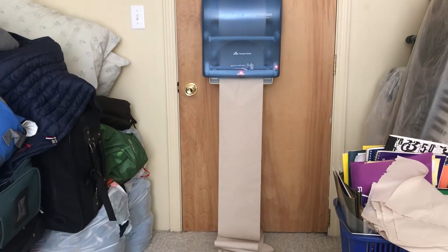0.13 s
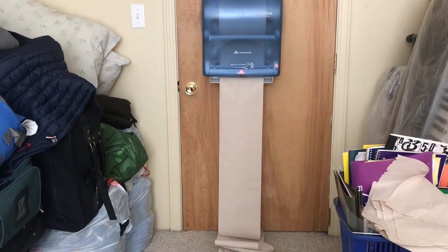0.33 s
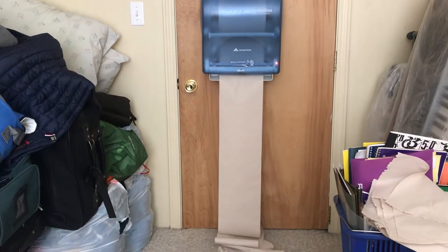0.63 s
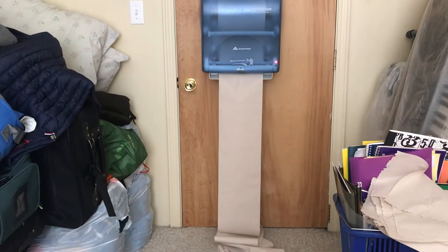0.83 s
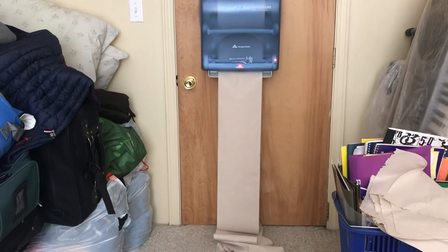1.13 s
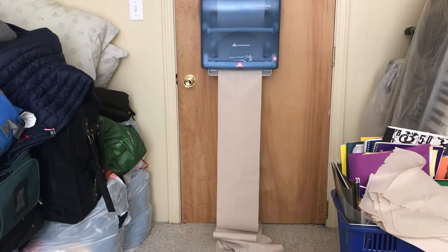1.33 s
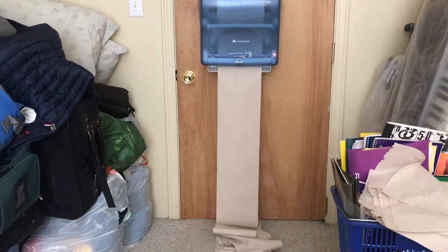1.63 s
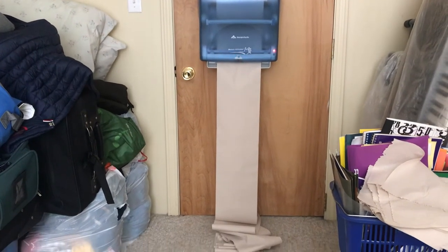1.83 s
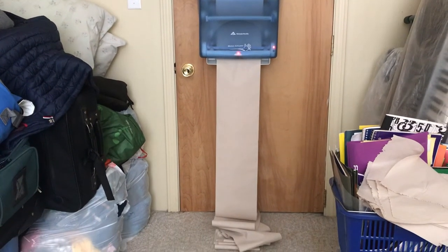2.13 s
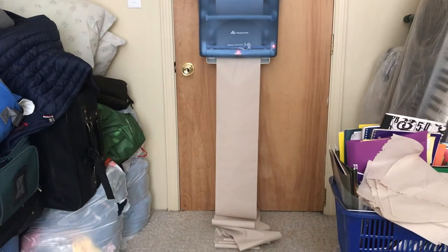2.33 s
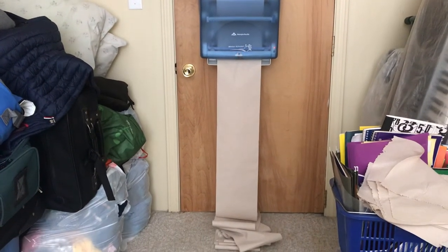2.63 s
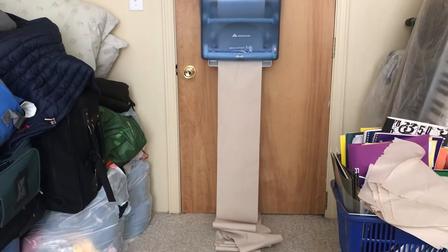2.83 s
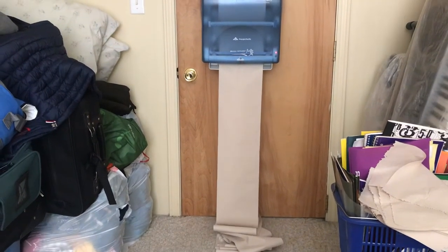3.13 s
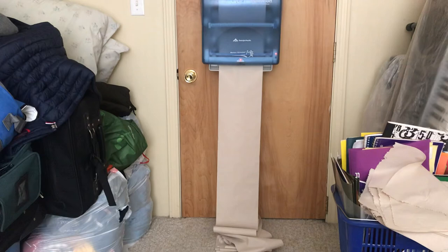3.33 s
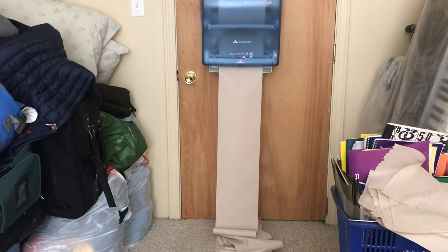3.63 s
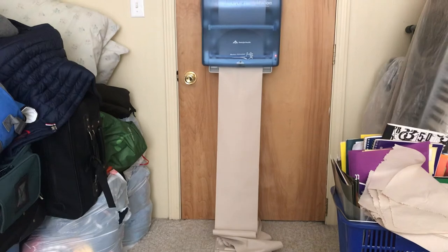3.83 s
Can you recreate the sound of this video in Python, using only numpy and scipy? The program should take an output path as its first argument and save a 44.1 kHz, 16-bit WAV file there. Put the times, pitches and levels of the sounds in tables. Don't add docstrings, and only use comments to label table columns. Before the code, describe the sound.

An automatic paper towel dispenser runs in a small, quiet bedroom, heard from a few metres away. Until about 2.6 seconds there is only low rumble, soft hiss and faint hum. A soft thud and gear knock lead into a rapidly rising motor whine, steady by 3.0, with hollow plastic rattle. Paper rustles and snaps from 2.8; roller thuds fall near 3.1 and 3.6. It is still running at 4.0.

```python
import sys
import numpy as np
from scipy import signal
from scipy.fft import rfft, irfft, next_fast_len
from scipy.io import wavfile
from scipy.ndimage import map_coordinates

SR = 44100
rng = np.random.default_rng(int(sys.argv[2]) if len(sys.argv) > 2 else 0)


def generate_wav(signal):
    frames = np.transpose(np.atleast_2d(signal))
    scaled = np.clip(frames, -1, 1) * 32767
    pcm = np.round(scaled).astype(np.int16)
    wavfile.write(sys.argv[1], SR, pcm)


def gain_from_decibels(decibels):
    exponent = np.asarray(decibels, float) / 20
    return 10 ** exponent


N = 176400

# freq_hz, level_db (per Hz)
RUMBLE_SPECTRUM = [(18, -23), (35, -7.5), (60, 0.5), (120, -5), (170, -5.5), (310, -11.5), (480, -25)]
# freq_hz, level_db (per Hz)
HISS_SPECTRUM = [(300, 1.5), (1000, -4), (3000, -10), (7000, -14.5), (11000, -15), (15700, -16)]
RUMBLE_DB, HISS_DB = -66.5, -72.5
MAINS_HZ, MAINS_DB = 59.8, -77

# start_s, level_db, pitch_hz, t60_s
THUDS = [
    (3.118, -43, 105, 0.12),
    (3.638, -41.5, 105.5, 0.14),
    (3.688, -52, 83, 0.18),
    (2.59, -62, 99, 0.24),
    (2.689, -54.5, 194, 0.14),
    (2.73, -51.5, 192, .12),
]

# time_s, speed_turns_per_s
SHAFT_SPEED = [(2.64, 50), (2.665, 90), (2.7, 128), (2.74, 152), (2.79, 168), (2.85, 176), (2.96, 183),
               (3.04, 186.5), (3.3, 187), (3.38, 185.5), (3.46, 180.5), (3.58, 178), (3.66, 176),
               (3.76, 180.5), (3.86, 184), (4.0, 182.5)]
# time_s, hum_db, load_db
SHAFT_STRENGTH = [(2.64, -95, -77), (2.67, -77, -68), (2.70, -77, -55), (2.74, -64, -49.5),
                  (2.79, -58.5, -46), (2.85, -53, -48), (2.96, -52, -46), (3.04, -66, -48),
                  (3.12, -61.5, -46.5), (3.19, -73, -47), (3.26, -61, -46.5), (3.36, -56, -47.5),
                  (3.46, -55.5, -47), (3.58, -59, -47), (3.679, -74, -47), (3.76, -66, -46),
                  (3.86, -59.5, -46), (4.0, -65, -48)]
FULL_SPEED = 142
TEETH_PER_TURN = 2.36
# multiple_of_mesh_rate, level_db (over the load)
MESH_HARMONICS = [(1, -16.5), (2, -13), (3, -16), (4, -14), (5, -23.5), (6, -26)]
# multiple_of_shaft_speed, level_db (over the load)
SIDE_LINES = [(1.5, -21), (1.7, -25.5), (3.71, -22), (3.92, -20), (4.21, -19), (5.62, -17), (5.9, -18),
              (7.58, -19), (8.25, -19.5), (8.92, -20.5), (10.46, -26), (11.25, -27)]
# freq_hz, width_hz, level_db
HOUSING_MODES = [(426, 24.5, 5), (660, 42, 2), (734, 18, 8), (852, 66, 3), (1022, 35, 8), (1140, 44, 6.5),
                 (1276, 47, 4), (1516, 25, 0.5), (1640, 80, 3), (1748, 61, 3.5), (1860, 29, -1),
                 (2130, 260, -1), (2653, 45, 2.5), (2940, 110, 4.5)]
# freq_hz, level_db (per Hz)
RATTLE_SPECTRUM = [(120, -7.5), (200, -6.5), (500, -5.5), (850, -8), (1700, -0.5), (2500, -8),
                   (4000, -20.5), (16000, -80)]
DULL_HZ, EARLY_DB = 1150, 8
# freq_hz, level_db (per Hz)
FIZZ_SPECTRUM = [(1500, -20), (2300, -2), (3050, 0), (3400, -8.5), (4500, -8.5), (9200, -21.5),
                 (10400, -27.5), (15800, -31.5)]
FIZZ_DB, BRIGHT_DB = -11.5, 12
# start_s, level_db, centre_hz, t60_s
KNOCKS = [
    (2.641, -66.5, 990, .2),
    (2.688, -53, 1000, 0.29),
    (2.785, -44.5, 1150, 0.21),
    (3.633, -42, 1580, 0.17),
]

# time_s, rustle_peak_db, snap_peak_db, length_s
PAPER_EVENTS = [(2.803, -54, -61, 0.019), (2.864, -74, -79, 0.016), (2.92, -78, -90, .01),
                (2.948, -65, -86, .025), (3.02, -60, -90, 0.019), (3.095, -68, -88, 0.051),
                (3.103, -53.5, -61, 0.019), (3.165, -66, -58.5, .018), (3.255, -57.5, -86, 0.019),
                (3.324, -57, -88, .012), (3.41, -60, -80, .025), (3.555, -56, -88, .02),
                (3.573, -70, -70, .015), (3.633, -55.5, -62, .015), (3.652, -55.5, -88, 0.013),
                (3.715, -56.5, -81, 0.033), (3.78, -73, -90, 0.0088), (3.818, -62, -88, 0.014),
                (3.878, -52.5, -84, .015), (3.912, -58.5, -88, .012), (3.94, -62, -86, .03),
                (3.955, -70, -54, 0.0086), (3.967, -72, -61, 0.014)]
# freq_hz, level_db (per Hz)
RUSTLE_SPECTRUM = [(2500, -16), (4000, -1), (4950, -3.5), (5500, -1), (6300, -9.5), (7300, -11.5),
                   (9500, -21.5), (16000, -45)]
# freq_hz, level_db (per Hz)
SNAP_SPECTRUM = [(5000, -27), (8000, 1), (9500, -3), (10600, -10), (12200, -6), (14300, -4), (16000, -6)]
FEED_S, CRINKLE_DB = 2.74, -74

# freq_hz, t60_s
ROOM_DECAY = [(200, 0.48), (2000, 0.28), (10000, 0.31)]
WET_DB = -5.5
# freq_hz, width_hz, depth_db
MIC_DIPS = [(4950, 190, -2.5), (7500, 300, -1.5), (10460, 690, -4.5)]


def unit(x):
    return x / np.sqrt(np.mean(x ** 2) + 1e-20)


def along(points, hz):
    f, v = np.transpose(points)
    return np.interp(np.log(hz + 1), np.log(f + 1), v)


def wobble(rate):
    knots = rng.standard_normal(int(N * rate / SR) + 4)
    return map_coordinates(knots, [np.arange(N) * rate / SR])


def filtered(x, response):
    m = next_fast_len(N + SR // 2)
    return irfft(rfft(x, m) * response(np.fft.rfftfreq(m, 1 / SR)), m)[..., :N]


def noise(spectrum, edge_db=-60):
    low, high = (spectrum[0][0] / 2, edge_db), (spectrum[-1][0] * 2, edge_db)
    points = [low] + list(spectrum) + [high]
    return unit(filtered(rng.standard_normal(N), lambda hz: gain_from_decibels(along(points, hz))))


def room_tone():
    t = np.arange(N) / SR
    rumble = gain_from_decibels(RUMBLE_DB + 0.42 * wobble(3.06)) * noise(RUMBLE_SPECTRUM)
    hiss = gain_from_decibels(HISS_DB) * noise(HISS_SPECTRUM)
    mains = gain_from_decibels(MAINS_DB + 2 * wobble(6.4)) * np.sin(2 * np.pi * MAINS_HZ * t + 0.31 * wobble(7.4))
    return rumble + hiss + mains


def roller():
    out = np.zeros(N)
    for start, db, hz, t60 in THUDS:
        age = np.clip(np.arange(N) / SR - start, 0, 2)
        envelope = gain_from_decibels(db - 60 * age / t60) * (1 - np.exp(-age / 0.005))
        out += envelope * np.sin(2 * np.pi * hz * age)
    return out


def shaft_hum(turn, hum_db):
    level = np.sqrt(2) * gain_from_decibels(hum_db + 1.2 * wobble(25))
    return level * np.sin(turn + 0.2 * wobble(30))


def resonance(hz):
    modes = sum(gain_from_decibels(db) * 1j * hz * w / (c * c - hz * hz + 1j * hz * w) for c, w, db in HOUSING_MODES)
    return 0.84 + modes


def gear_whine(turn, speed):
    grid_hz = np.arange(4000.)
    carried = np.abs(resonance(grid_hz)) ** 0.39
    lines = [(TEETH_PER_TURN * k, db) for k, db in MESH_HARMONICS] + list(SIDE_LINES)
    whine = np.zeros(N)
    for k, db in lines:
        level = gain_from_decibels(db + 2.4 * wobble(21.99)) * np.interp(k * speed, grid_hz, carried)
        whine += level * np.sin(k * turn + 0.65 * wobble(40))
    return whine


def gear_rattle(turn, speed):
    teeth = (1 + 0.1 * np.cos(turn)) * (1 + 0.3 * np.cos(TEETH_PER_TURN * turn)) * gain_from_decibels(0.33 * wobble(18))
    impacts = teeth * gain_from_decibels(1.7 * wobble(250)) * rng.standard_normal(N)
    full = unit(filtered(impacts, lambda hz: gain_from_decibels(along(RATTLE_SPECTRUM, hz)) * resonance(hz)))
    dull = filtered(full, lambda hz: 1 / (1 + (hz / DULL_HZ) ** 6))
    ratio = speed / FULL_SPEED
    early_gain = gain_from_decibels(EARLY_DB * np.clip(1 - ratio, 0, 1))
    body = early_gain * dull + (full - dull) * np.clip(ratio, 0, 1) ** 1.2
    grains = gain_from_decibels(2.2 * wobble(70) + 1.6 * wobble(700))
    fizz = unit(teeth * grains * noise(FIZZ_SPECTRUM))
    return body + gain_from_decibels(FIZZ_DB + BRIGHT_DB * np.log10(ratio)) * fizz


def knocks():
    t = np.arange(N) / SR
    out = np.zeros(N)
    for start, db, hz, t60 in KNOCKS:
        decay = gain_from_decibels(db - 60 * np.clip(t - start, 0, 1) / t60)
        attack = np.clip((t - start) / 0.0037, 0, 1)
        out += decay * attack * noise([(hz / 1.23, -6), (hz, 0), (hz * 1.16, -6)])
    return out


def motor():
    t = np.arange(N) / SR
    time, hum_db, load_db = np.transpose(SHAFT_STRENGTH)
    speed = np.interp(t, *np.transpose(SHAFT_SPEED))
    load = gain_from_decibels(np.interp(t, time, load_db, left=-150))
    turn = 2 * np.pi * np.cumsum(speed * (1 + 0.002 * wobble(25.06))) / SR
    hum = shaft_hum(turn, np.interp(t, time, hum_db, left=-150))
    whine = gear_whine(turn, speed)
    through_wall = hum + load * whine
    through_air = load * (0.2 * whine + gear_rattle(turn, speed)) + knocks()
    return through_wall, through_air


def paper():
    t = np.arange(N) / SR
    swell, crack = np.zeros(N), np.zeros(N)
    for time, rustle_db, snap_db, length in PAPER_EVENTS:
        swell += gain_from_decibels(rustle_db) * np.exp(-((t - time) / (0.42 * length)) ** 2)
        decay = gain_from_decibels(snap_db + 0.5 - 18 * np.clip(t - time, 0, 1) / length)
        crack += decay * np.clip((t - time) / 0.007 + 0.5, 0, 1)
    crinkle = gain_from_decibels(CRINKLE_DB + 5.4 * wobble(45)) * np.clip((t - FEED_S) / 0.06, 0, 1)
    rustle = (swell + crinkle) * gain_from_decibels(2.1 * wobble(350)) * noise(RUSTLE_SPECTRUM)
    snap = crack * gain_from_decibels(1.5 * wobble(500)) * noise(SNAP_SPECTRUM)
    return rustle + snap


def room(x):
    hz, t, z = signal.stft(rng.standard_normal(SR // 2), SR, nperseg=256)
    decay = gain_from_decibels(-60 * t / along(ROOM_DECAY, hz)[:, None])
    tail = signal.istft(z * decay, SR, nperseg=256)[1]
    delayed = np.pad(x, (200, 0))
    return signal.fftconvolve(delayed, tail / np.linalg.norm(tail))[:N]


def scene():
    tone = room_tone()
    thuds = roller()
    through_wall, gears = motor()
    near = gears + paper()
    airborne = 0.89 * (near + gain_from_decibels(WET_DB) * room(near))
    return (airborne + through_wall + thuds + tone)[None]


def roll_off(x):
    return signal.sosfilt(signal.butter(12, 15700, fs=SR, output="sos"), x)


def record(dry):
    def port(hz):
        return gain_from_decibels(sum(db * np.exp(-((hz - c) / w) ** 2) for c, w, db in MIC_DIPS))
    mix = filtered(dry, port)
    return roll_off(mix)


dry = scene()
out = record(dry)
generate_wav(out)
```